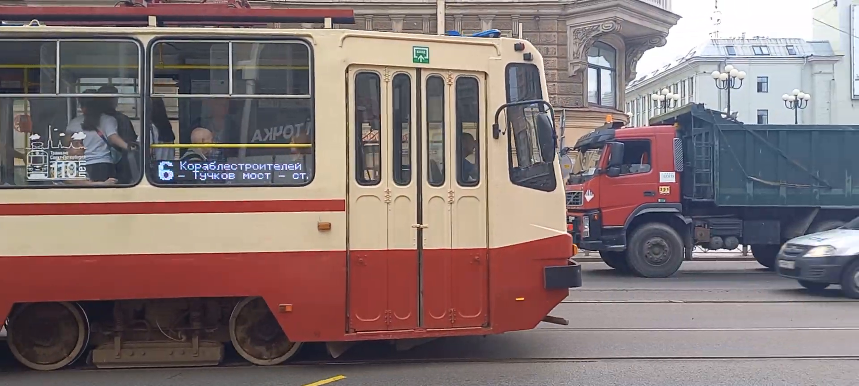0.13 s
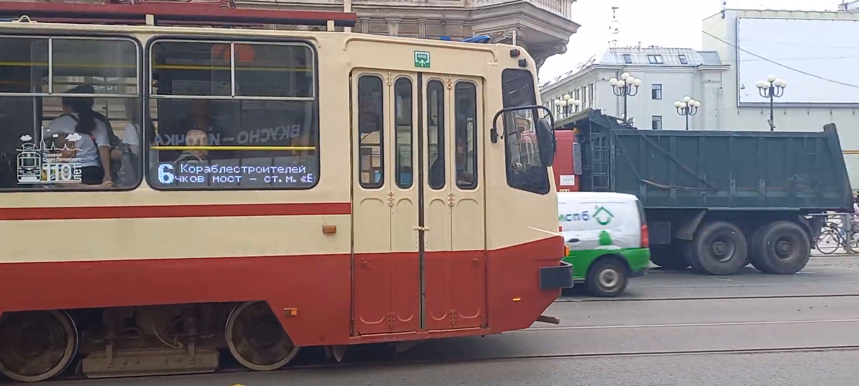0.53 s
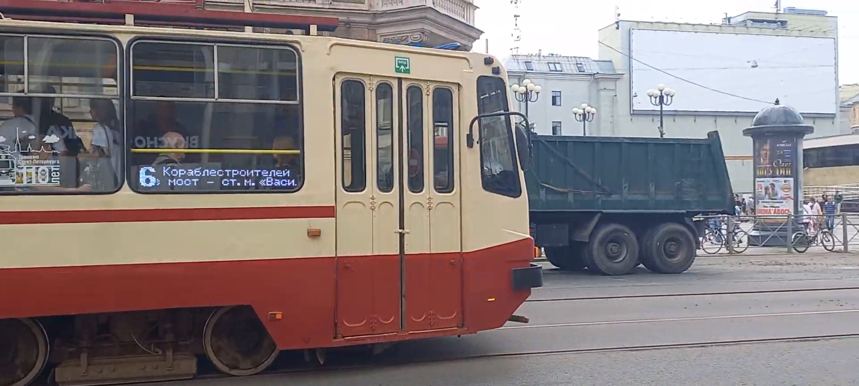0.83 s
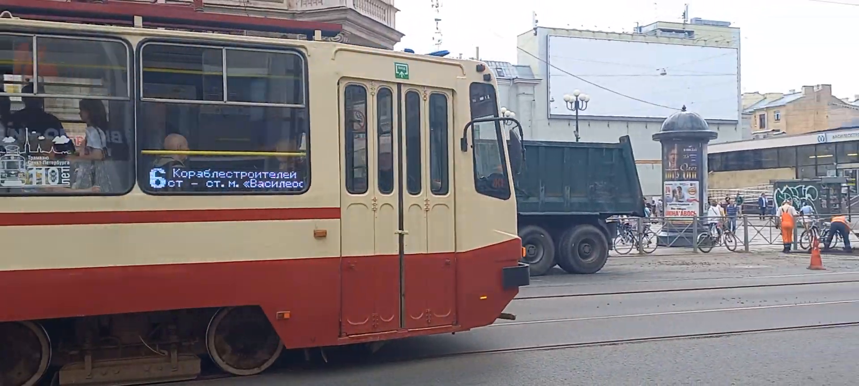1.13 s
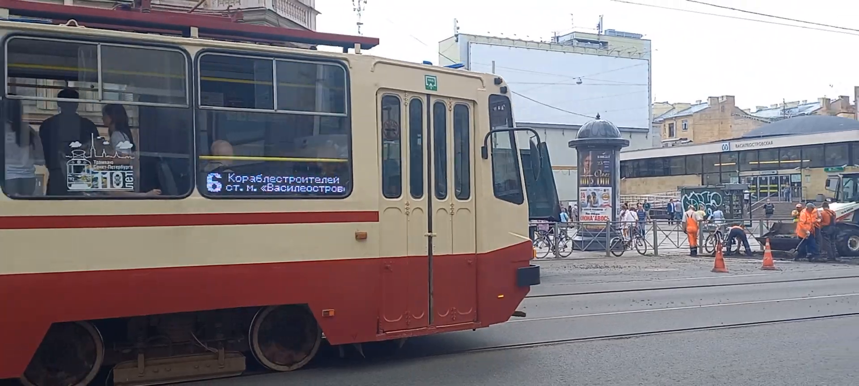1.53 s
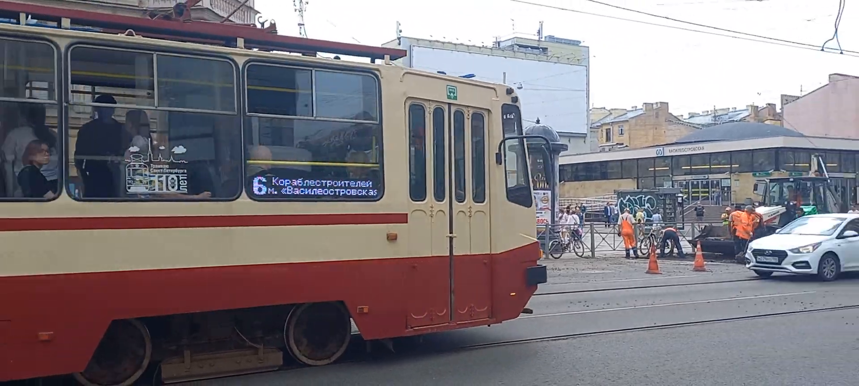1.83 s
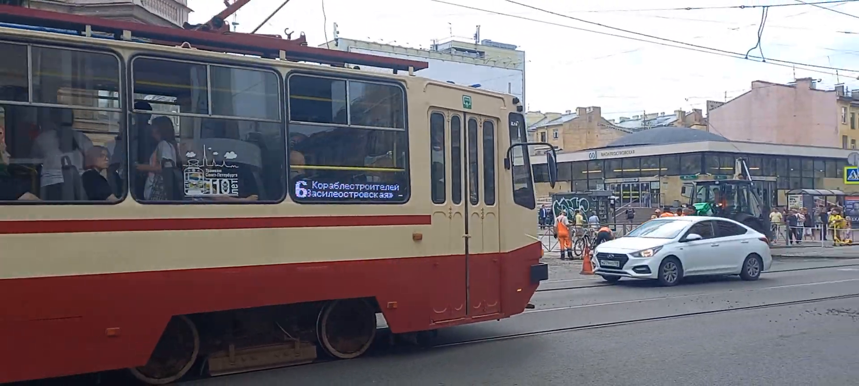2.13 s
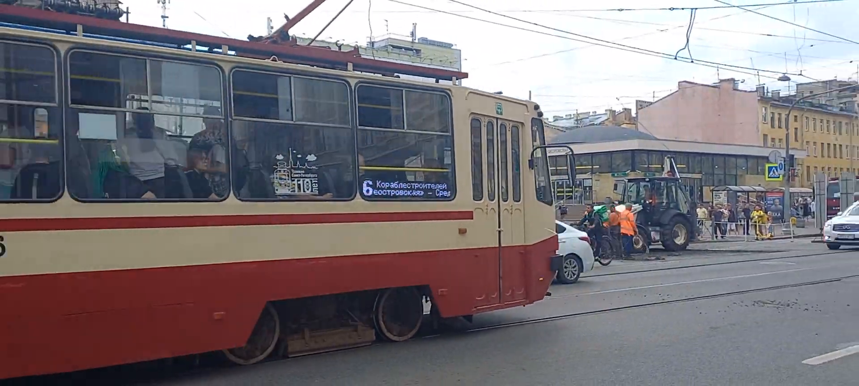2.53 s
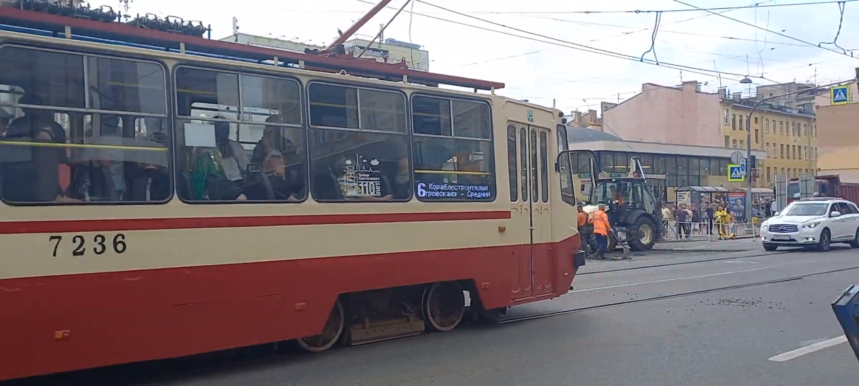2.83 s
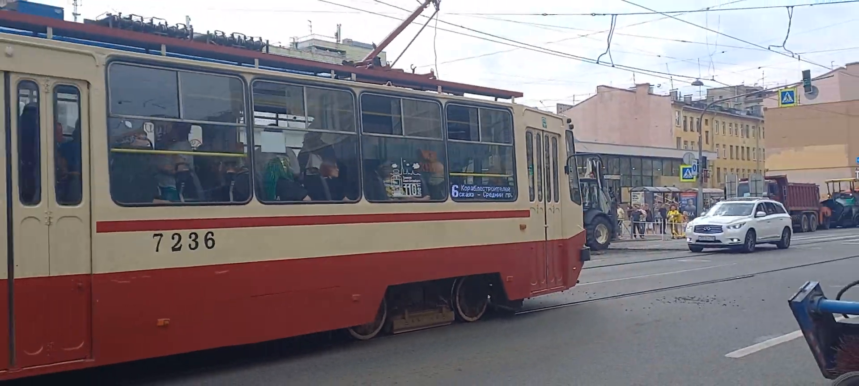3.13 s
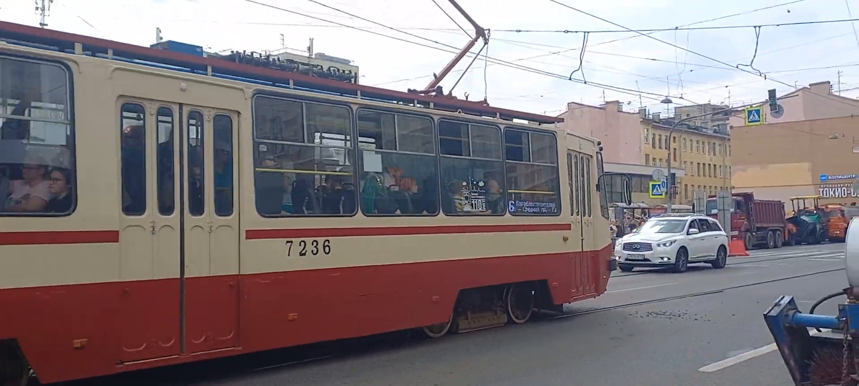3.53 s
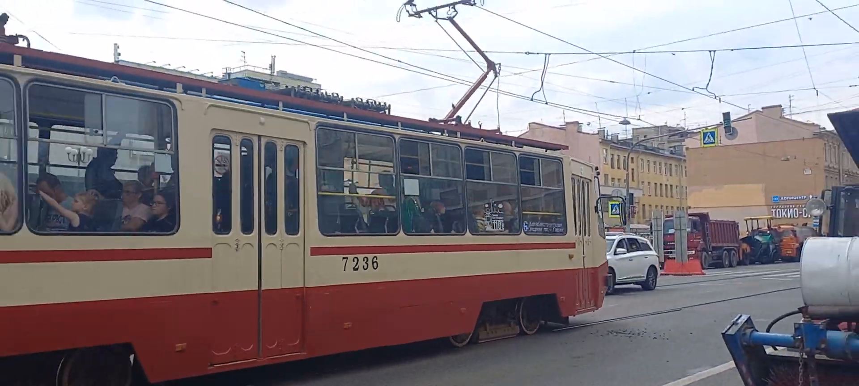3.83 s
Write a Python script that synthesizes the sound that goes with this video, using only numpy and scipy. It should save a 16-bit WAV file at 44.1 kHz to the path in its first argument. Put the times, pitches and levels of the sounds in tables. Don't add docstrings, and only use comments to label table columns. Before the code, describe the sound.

Heavy tram rolling by close, deep body rumble, faint wheel ringing, loose metal chinking and clanging.

```python
import sys
import numpy as np
from scipy import signal
from scipy.io import wavfile

SR = 44100
rng = np.random.default_rng(int(sys.argv[2]) if len(sys.argv) > 2 else 0)


def put_to_file(sound):
    columns = np.atleast_2d(sound).T
    safe = np.clip(columns, -1, 1)
    whole_steps = np.round(safe * 32767)
    wavfile.write(sys.argv[1], SR, whole_steps.astype(np.int16))


def attenuation_scalar(level_db):
    decades = np.asarray(level_db, float) / 20
    return 10 ** decades


N = 176400


def rms_one(x):
    return x / np.sqrt(np.mean(x ** 2) + 1e-20)


def in_time(rows):
    s, *columns = np.transpose(rows)
    return [np.interp(np.arange(N) / SR, s, c) for c in columns]


def at_hz(points, hz):
    table_hz, db = np.transpose(points)
    return np.interp(np.log(hz), np.log(table_hz), db)


def drift(rate_hz):
    hop = 40
    pole = np.exp(-2 * np.pi * rate_hz * hop / SR)
    noise = rng.standard_normal(N // hop + 2002)
    slow = signal.lfilter([1], [1, -2 * pole, pole * pole], noise)[2000:]
    return np.interp(np.arange(N) / hop, np.arange(len(slow)), rms_one(slow))


def ring(x, hz, t60):
    decay = attenuation_scalar(-60 / (t60 * SR))
    w = 2 * np.pi * hz / SR
    return signal.lfilter([0, np.sin(w)], [1, -2 * decay * np.cos(w), decay * decay], x + 1e-18)


def grains(rate, spread_db):
    sizes = attenuation_scalar(spread_db * np.minimum(rng.exponential(1, (2, N)), 5))
    clicks = sizes * rng.choice([-1, 1], (2, N))
    return rms_one(clicks * (rng.random((2, N)) < rate / SR))


def stereo(pair, hz, narrow_db=0):
    # pitch in Hz, side minus mid in dB.
    street_width = [(60, -6), (200, -13), (550, -5.5), (900, 2.5), (1400, 3), (2200, -3), (2900, 6),
                    (8000, 4)]
    side = attenuation_scalar(at_hz(street_width, hz) - narrow_db) * pair[1]
    return pair[0] + side * [[1], [-1]]


def banded(spectrum, patchy_db, drive=0, shared=1.0, narrow_db=0):
    low, high = spectrum[0][0] * .85, min(spectrum[-1][0] * 1.3, 17000)
    edges = np.geomspace(low, high, int(3 * np.log2(high / low)) + 1)
    white = rng.standard_normal((2, 2, N)) + drive
    together = drift(20.6)
    out = 0
    for k, (a, b) in enumerate(zip(edges, edges[1:])):
        sos = signal.butter(3, [a, b], "band", fs=SR, output="sos")
        run_in = np.pad(white[k % 2], ((0, 0), (2000, 0)), "wrap")
        pair = signal.sosfilt(sos, run_in)[:, 2000:]
        hz = np.sqrt(a * b)
        flicker_db = patchy_db * (shared * together + drift(14.3))
        out = out + attenuation_scalar(at_hz(spectrum, hz) + flicker_db) * stereo(pair, hz, narrow_db)
    return out / np.std(out.mean(axis=0))


def burst(s, hold, tail):
    out = np.zeros(N)
    i = slice(int(s * SR), int((s + .4) * SR))
    t = np.arange(N)[i] / SR - s
    out[i] = np.clip(t / 0.001, 0, 1) * np.exp(-np.maximum(t - hold, 0) / tail)
    return out


def rumble():
    # time in seconds, level in dB.
    nearness = [
        (0.0, -25),
        (0.57, -26.5),
        (4.0, -22.5),
    ]
    # pitch in Hz, density in dB per Hz.
    body_tone = [(38, -13.5), (70, -4), (134, 0), (180, -6.5), (265, 1), (440, -8.5), (580, -20.5),
                 (900, -26)]
    # start in seconds, swell in dB over the rumble.
    jolts = [(0.952, 5), (1.35, 1.5), (1.451, 5.5), (1.06, 4.5), (1.772, 3), (1.981, 4.5), (2.2, 4),
             (2.398, 6.5), (2.56, 2), (2.611, -3), (3.472, 6.5), (3.55, -1.5), (3.921, 6.5)]
    level_db, = in_time(nearness)
    jolt_db = sum(db * burst(s, hold=0.019, tail=0.011) for s, db in jolts)
    thuds = attenuation_scalar(-2) * grains(90, 2.34)
    return attenuation_scalar(level_db + jolt_db) * banded(body_tone, 1.0, thuds)


def booms():
    # start in seconds, length in seconds, level in dB, pitch in Hz. The row at 1.484 s is a wind pop
    panels = [(0.062, .09, -16.5, 137.3), (0.193, 0.14, -17, 137), (0.284, .05, -25.5, 415),
              (0.93, 0.033, -26, 194), (1.264, .04, -27.5, 339), (1.325, 0.098, -31.5, 357),
              (1.45, 0.052, -21, 316.5), (1.484, 0.024, -21, 99), (1.507, .02, -23, 350),
              (1.588, 0.067, -20, 235.6), (1.996, 0.037, -23.5, 150), (2.098, 0.087, -19.5, 265),
              (2.273, 0.093, -22, 130), (2.391, 0.046, -14.5, 135), (2.438, 0.055, -19, 130),
              (2.467, 0.073, -25, 308.7), (2.616, 0.033, -18.5, 341), (2.708, .04, -24, 312),
              (2.775, 0.084, -24, 249.4), (2.786, 0.083, -19.5, 142.3), (2.969, 0.042, -19.5, 267),
              (3.461, 0.052, -19, 125), (3.459, 0.042, -20, 270), (3.53, 0.16, -22, 162),
              (3.805, 0.048, -24, 258.3), (3.919, 0.037, -17, 250)]
    t = np.arange(N) / SR
    out = np.zeros(N)
    for s, length, db, hz in panels:
        swell = np.sin(np.pi * np.clip((t - s) / length, 0, 1)) ** 0.34
        tone = np.sin(2 * np.pi * hz * t) + 0.14 * np.sin(4 * np.pi * hz * t)
        out += attenuation_scalar(db) * swell * tone
    return out


def wheels():
    # time in seconds, level in dB.
    grind = [(0, -47), (.15, -46), (.42, -46.5), (.52, -54), (.8, -51.5), (1.5, -51.5), (1.75, -48.5),
             (2.1, -48), (2.35, -44), (2.8, -42), (3.25, -41.5), (3.45, -42.5), (3.65, -41.5),
             (3.85, -43.5), (4, -39.5)]
    # pitch in Hz, width in Hz, level in dB.
    modes = [(1896, 60, -7), (2090, 220, -0.5), (2287, 57, -8), (3720, 85, -9), (4046, 120, -7),
             (4780, 65, -12.5), (5640, 100, -8), (6080, 85, -10), (6860, 133, -6.5), (8800, 60, -13),
             (9160, 60, -14), (12140, 80, -20), (13500, 120, -22), (15450, 100, -28)]
    # pitch in Hz, density in dB per Hz.
    scrape_tone = [(1300, -4), (2250, -1.5), (3000, -15), (5900, -11.5), (7200, -18), (8200, -42),
                   (12500, -18), (15000, -34)]
    narrow_db = 4.5
    level_db, = in_time(grind)
    drive = rng.standard_normal((2, N)) + 0.7 * grains(330, 3.2)
    rings = np.zeros((2, N))
    for hz, width, db in modes:
        flicker = attenuation_scalar(db + 4.5 * drift(9.4)) * np.sqrt(width)
        rings += flicker * stereo(rms_one(ring(drive, hz, 2.0 / width)), hz, narrow_db)
    rings = attenuation_scalar(6 + 0.63 * (level_db - level_db.max())) * rms_one(rings)
    scrape = attenuation_scalar(2.5) * banded(scrape_tone, 1.55, .5 * grains(500, 1.2), narrow_db=narrow_db)
    return attenuation_scalar(level_db) * (rings + scrape)


def clangs():
    # start in seconds, level in dB, contact in seconds, clatter modes against the main ring in dB.
    strikes = [
        (1.615, -39, 0.049, 8),
        (1.703, -39.5, 0.013, 10),
        (2.25, -38, .03, 4),
        (3.463, -37, 0.02, 16),
        (3.49, -28, 0.0094, 9.5),
        (3.505, -26.5, 0.058, 8),
        (3.899, -21.5, 0.0039, 1),
        (3.908, -14.5, 0.021, 0),
        (3.948, -29, 0.017, 5),
        (3.987, -24, 0.015, -1),
    ]
    # pitch in Hz, level in dB, t60 in seconds.
    modes = [(2283, 2.5, 0.11), (1143, -17.5, 0.058), (1290, -16, 0.045), (1450, -16, .03),
             (1680, -19.5, .04), (1875, -12.5, 0.073), (2080, -11, 0.054), (2190, -10, 0.08),
             (2430, -12, .05), (2850, -25, 0.1), (3725, -23.5, 0.088)]
    side_db, rough_db = -7.5, 1.0
    echo_s, echo_db = 0.019, -12.5
    out = np.zeros((2, N))
    spread_db = rng.normal(0, 2.1, (len(strikes), len(modes)))
    blows = np.array([attenuation_scalar(db) * burst(s, hold, 0.002) / (hold * SR) for s, db, hold, _ in strikes])
    clatter_db = np.array(strikes)[:, 3]
    for k, (hz, level_db, t60) in enumerate(modes):
        is_clatter = k > 0
        push = attenuation_scalar((clatter_db + spread_db[:, k]) * is_clatter) @ blows
        wobble = (1.5 if is_clatter else .35) * drift(41)
        wave = np.exp(1j * (2 * np.pi * hz * np.arange(N) / SR + wobble))
        mid, side = ring(push * np.array([wave.real, attenuation_scalar(side_db) * wave.imag]), hz, t60)
        out += attenuation_scalar(level_db + 12.5 + rough_db * drift(41)) * (mid + side * [[1], [-1]])
    lag = int(echo_s * SR)
    out[:, lag:] += attenuation_scalar(echo_db) * out[::-1, :-lag]
    return out * attenuation_scalar(np.array([[-1.2], [1.2]]))


def chinks():
    # start in seconds, peak in dB, loudest ring in Hz, shake in seconds. The rows from 3.90 to 3.93 s
    loose_parts = [(.777, -41, 3720, .01), (.968, -35.5, 3530, 0.009), (0.911, -37, 5750, 0.02),
                   (1.077, -35.5, 2895, 0.032), (1.186, -34, 11600, 0.033), (1.266, -39, 5070, .01),
                   (1.603, -26, 7530, 0.013), (1.615, -24, 5640, 0.013), (1.635, -32, 9400, 0.055),
                   (1.706, -33, 2850, 0.038), (1.73, -42, 6100, .03), (2.028, -38, 5570, .01),
                   (2.148, -37, 3860, .01), (2.269, -32, 6150, 0.017), (2.425, -29.5, 8830, 0.0064),
                   (2.51, -39, 6860, .025), (2.588, -35, 5470, .012), (2.665, -36, 9100, 0.09),
                   (2.763, -28, 6940, 0.023), (2.83, -41, 9370, .03), (2.844, -32.5, 5560, 0.025),
                   (3.0, -32.5, 5640, .03), (3.116, -25, 6100, 0.011), (3.335, -29.5, 8500, .015),
                   (3.475, -20, 12070, 0.026), (3.5, -28, 3725, 0.054), (3.579, -27.5, 6900, 0.027),
                   (3.578, -21.5, 9300, 0.017), (3.617, -26.5, 6800, 0.012), (3.68, -28, 14000, 0.0098),
                   (3.8, -28, 9100, 0.012), (3.743, -37.5, 3870, 0.013), (3.903, -22, 6150, 0.014),
                   (3.918, -20.5, 4810, 0.017), (3.915, -32, 12870, 0.009), (3.932, -24, 5960, 0.013),
                   (3.95, -31, 4120, 0.022), (3.95, -31, 10000, 0.025)]
    # pitch in Hz, density in dB per Hz.
    metal_tone = [(1000, -8.5), (2260, 6), (3000, -14), (5600, -6.5), (7300, -12.5), (8200, -14.5),
                  (15000, -18.5)]
    narrow_db = 4.5
    puff, rings = np.zeros(N), np.zeros((2, N))
    drive = rng.standard_normal((2, N))
    for s, db, hz, shake in loose_parts:
        shape = attenuation_scalar(db) * burst(s, max(shake, .003), 0.0066)
        puff += shape + attenuation_scalar(db - 14.0) * burst(s, shake, 0.033)
        i = slice(int(s * SR), int((s + .3) * SR))
        rattle = (shape * drive)[:, i]
        others_hz = 3500 * 4 ** rng.uniform(0, 1, 4)
        for f, ring_db in zip([hz, *others_hz], [0, -12, -12, -12, -12]):
            t60 = 0.058 * 5000 / (f + 2500)
            tone = stereo(ring(rattle, f, t60), f, narrow_db)
            rings[:, i] += attenuation_scalar(ring_db + 0.46 * at_hz(metal_tone, f)) * tone
    return attenuation_scalar(-13) * puff * banded(metal_tone, 1.0, narrow_db=narrow_db) + attenuation_scalar(-26) * rings


def growl():
    # time in seconds, level in dB.
    approach = [
        (2.0, -43),
        (2.2, -43),
        (2.85, -38),
        (2.97, -33.5),
        (3.55, -35),
        (3.9, -33),
        (4, -46),
    ]
    # pitch in Hz, density in dB per Hz.
    tone = [(520, 2.5), (620, 6.5), (700, 1.5)]
    return attenuation_scalar(in_time(approach)[0]) * banded(tone, 2.6, narrow_db=4)


def motor():
    # time in seconds, pitch in Hz, level in dB.
    whine = [
        (2.2, 420, -62),
        (2.5, 449, -48.5),
        (2.83, 482, -46),
        (3.05, 485, -59),
        (3.3, 509, -30.5),
        (3.5, 522, -36),
        (3.62, 530, -68),
    ]
    hz, db = in_time(whine)
    phase = 2 * np.pi * np.cumsum(hz * (1 + 0.0053 * drift(3.8))) / SR
    return attenuation_scalar(db + 6.8 * drift(9.3)) * np.sin(phase + np.array([[.4], [-.4]]))


def wind():
    # time in seconds, level in dB.
    gusts = [
        (1.2, -33),
        (1.38, -24),
        (1.8, -26.5),
        (2.0, -24.5),
        (2.68, -22.5),
        (2.75, -46),
        (3.7, -64),
        (3.95, -25.5),
    ]
    level_db, = in_time(gusts)
    sos = signal.butter(3, [72.6, 385], "band", fs=SR, output="sos")
    lumps = np.array([attenuation_scalar(7 * np.tanh(drift(12.0))) for _ in range(2)])
    return attenuation_scalar(level_db) * rms_one(signal.sosfilt(sos, lumps * rng.standard_normal((2, N))))


def car():
    # time in seconds, level in dB.
    passing = [
        (0, -44),
        (.15, -34.5),
        (.3, -32.5),
        (.45, -33.5),
        (.6, -37.5),
        (.75, -43),
    ]
    # pitch in Hz, density in dB per Hz.
    tyre_tone = [(700, -3.5), (980, 17), (1450, -25.5), (2100, -2), (3000, -14), (8500, -27.5),
                 (12500, -24)]
    return attenuation_scalar(in_time(passing)[0]) * banded(tyre_tone, 1.75, narrow_db=4)


def street():
    # time in seconds, level in dB.
    roar = [(0, -40.5), (.58, -39.5), (.75, -41.5), (1.4, -40.5), (2.2, -39), (2.5, -43.5), (3.3, -47.5),
            (4, -43)]
    # pitch in Hz, density in dB per Hz.
    tone = [(500, -2), (700, -9.5), (1060, -10.5), (1400, -8.5), (2000, -7), (3200, -20), (8000, -35),
            (15000, -39.5)]
    return attenuation_scalar(in_time(roar)[0] - 0.5) * banded(tone, 1.5, narrow_db=3.5)


def from_left(x):
    return np.array([x[0], np.roll(x[1], 18)])


def scene():
    tram = rumble() + booms() + clangs() + growl() + motor()
    left = from_left(wheels() + chinks() + street())
    return tram + left + wind() + car()


def low_pass(x):
    return signal.sosfilt(signal.butter(12, 15830, fs=SR, output="sos"), x)


def record(dry):
    treble_cut = signal.ellip(10, .5, 60, 15750, fs=SR, output="sos")
    bass_cut = signal.butter(2, 43, "high", fs=SR, output="sos")
    mix = signal.sosfilt(bass_cut, signal.sosfilt(treble_cut, dry))
    return low_pass(mix)


dry = scene()
out = record(dry)
put_to_file(out)
```